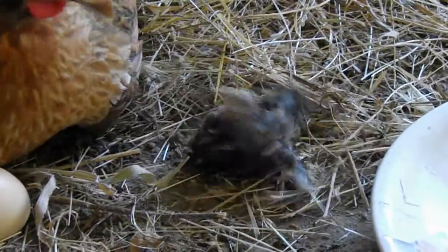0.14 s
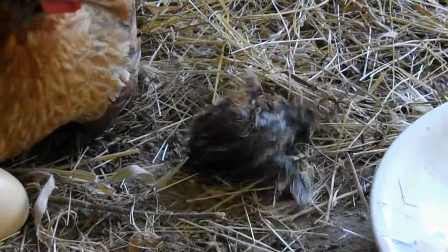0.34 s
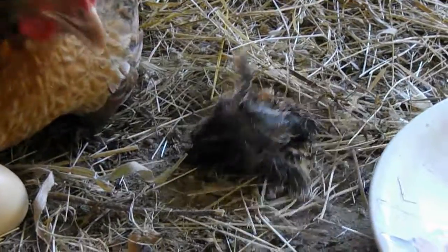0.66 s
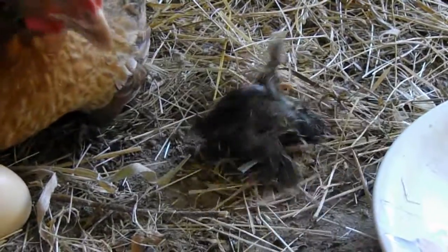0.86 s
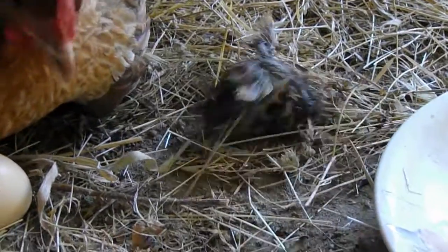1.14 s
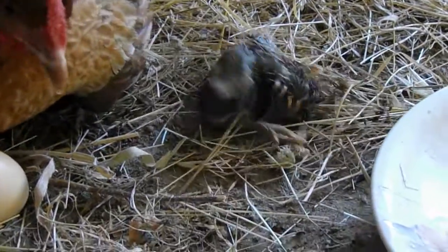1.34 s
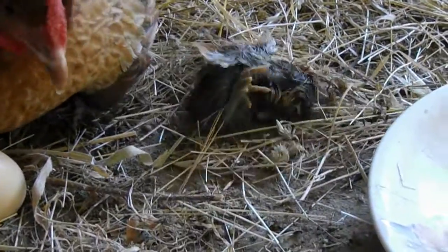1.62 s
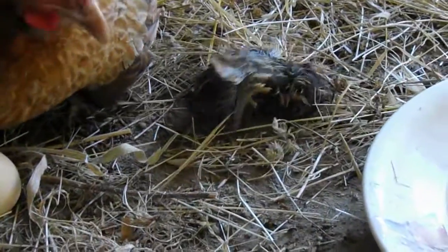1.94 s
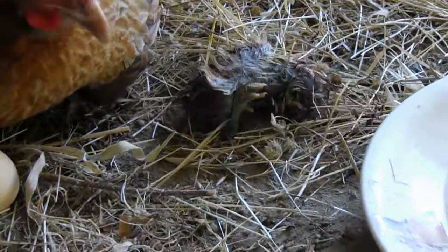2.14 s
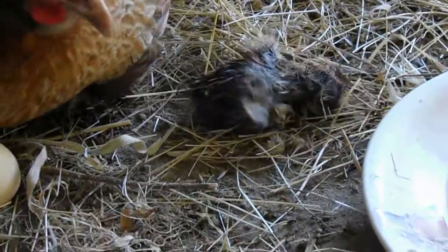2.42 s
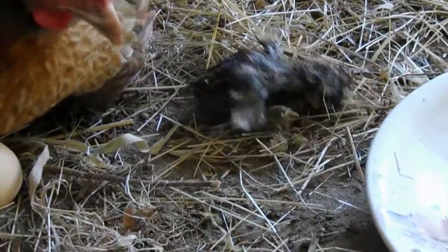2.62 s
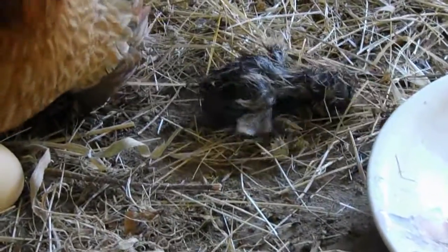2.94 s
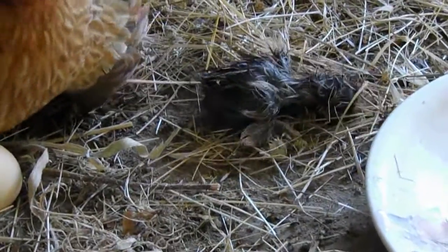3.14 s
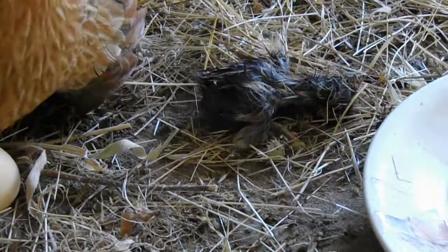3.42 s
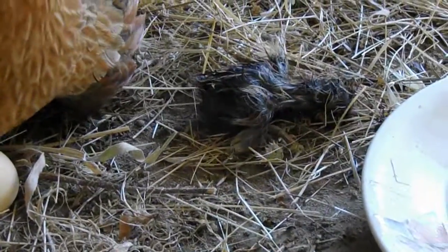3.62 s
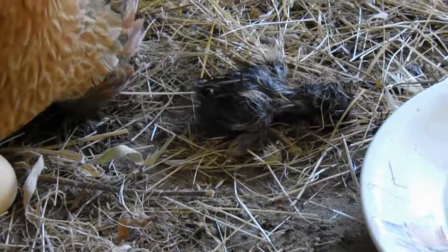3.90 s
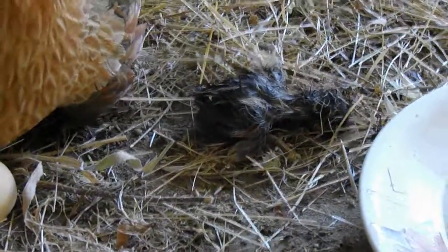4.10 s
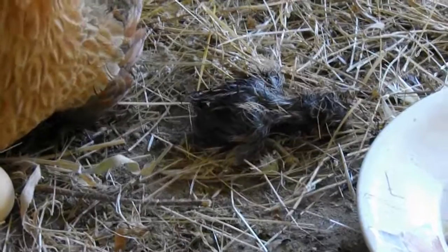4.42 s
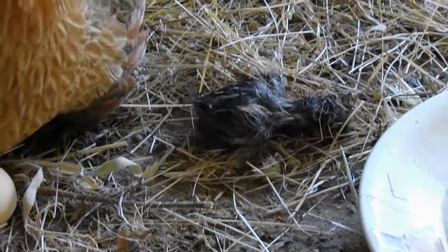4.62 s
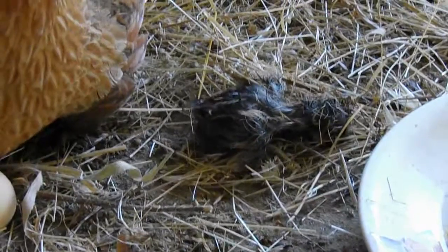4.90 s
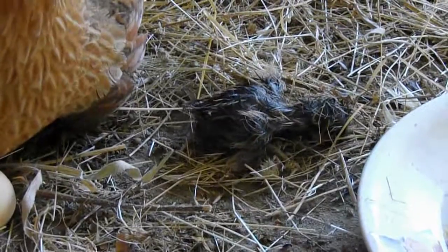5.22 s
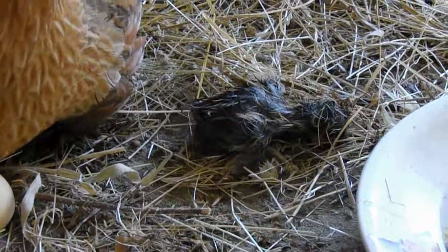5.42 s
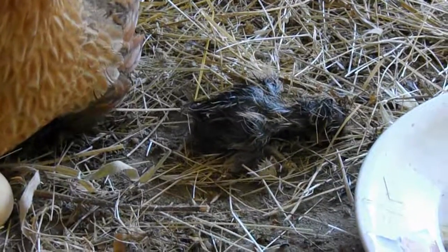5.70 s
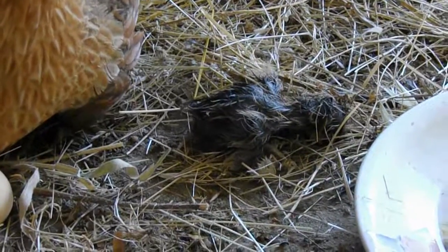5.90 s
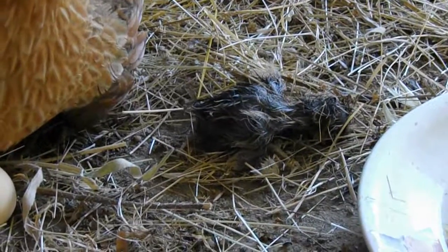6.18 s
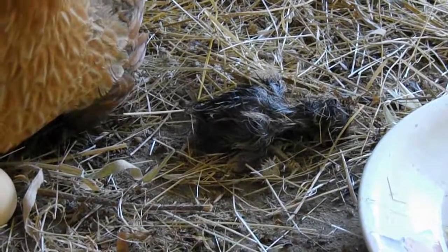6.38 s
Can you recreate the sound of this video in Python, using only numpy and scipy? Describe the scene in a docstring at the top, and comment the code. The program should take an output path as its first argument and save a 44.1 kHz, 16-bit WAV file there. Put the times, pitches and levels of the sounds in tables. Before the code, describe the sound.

Close up in a straw-floored shed, a hen's soft popping clucks answer a tiny chick's shrill peeps, which start loud and grow gentle and sparse.

```python
"""In a small shed, a newly hatched chick lies in straw and peeps: five louder arched whistles, some with
a hoarse crack near the top, then softer ones. Each is a near sine on a gliding pitch.
The hen beside it answers with low two-part clucks and throaty murmurs: voiced pulses and breath noise
through throat, mouth and beak resonances. Straw ticks now and then as tiny noise bursts, over
a steady hiss, handling rumble and a faint low drone, all made of shaped noise."""
import sys
import numpy as np
from scipy import signal
from scipy.fft import rfft, irfft, next_fast_len
from scipy.io import wavfile
from scipy.ndimage import uniform_filter1d

SR = 44100
rng = np.random.default_rng(int(sys.argv[2]) if len(sys.argv) > 2 else 0)


def materialize(psi):
    """Save the field psi as 16-bit PCM at rate SR to the path in sys.argv[1].

    A 1-D psi becomes a single channel; in a 2-D psi each row is a channel.
    """
    bounded = np.clip(np.atleast_2d(psi).T, -1, 1)
    quanta = np.round(bounded * 32767).astype(np.int16)
    wavfile.write(sys.argv[1], SR, quanta)


N = 288855
TIME = np.arange(N) / SR


def from_db(db):
    """Decibels to gain."""
    return 10 ** (np.asarray(db) / 20)


def rms_one(x):
    """Scale to an rms of one."""
    return x / np.sqrt(np.mean(x ** 2) + 1e-20)


def curves(rows, at):
    """Every further column of a table, joined by straight lines over the first column."""
    first, *columns = np.transpose(rows)
    return [np.interp(at, first, column) for column in columns]


def gate(t, start, end, edge):
    """One between start and end, with smooth edges centred on both."""
    opened = np.clip(np.minimum(t - start, end - t) / edge + .5, 0, 1)
    return np.sin(np.pi / 2 * opened) ** 2


def flutter(hz, size):
    """Random motion of rms one, mostly slower than the given rate."""
    lowpass = signal.butter(2, hz, fs=SR, output="sos")
    return rms_one(signal.sosfilt(lowpass, rng.standard_normal(size)))


def resonance(x, hz, width_hz):
    """A two-pole resonance with a gain of about one on top."""
    r = np.exp(-np.pi * width_hz / SR)
    zeros = np.array([1, 0, -1]) * (1 - r * r) / 2
    poles = [1, -2 * r * np.cos(2 * np.pi * hz / SR), r * r]
    return signal.lfilter(zeros, poles, x + 1e-18)


def coloured_noise(spectrum):
    """Noise of rms one, shaped by a spectrum that is joined over log frequency."""
    hz, db = np.transpose(spectrum)
    size = next_fast_len(N)
    bins = np.maximum(np.arange(size // 2 + 1) * SR / size, 1)
    gain = from_db(np.interp(np.log(bins), np.log(hz), db))
    return rms_one(irfft(rfft(rng.standard_normal(size)) * gain, size)[:N])


def air_hiss(level_db=-46.5):
    """Steady air noise with a fixed colour."""
    # Colour of the hiss. Each row: frequency in Hz, relative density in dB.
    hiss_colour = [(60, -14), (150, -4), (300, -10), (550, -10.5), (850, -13), (1200, -14.5), (2500, -15),
                   (3600, -15), (4800, -10.5), (5600, -16), (9000, -18), (13000, -19.5), (15600, -26.5)]
    return from_db(level_db) * coloured_noise(hiss_colour)


def handling_rumble(deep_db=-39.5, wander_db=3, wander_hz=3, upper_db=-50):
    """A deep rumble that wanders in level, and a higher one with rubs that swell above it."""
    # Colours of the deep and the higher rumble. Each row: frequency in Hz, relative density in dB.
    deep_colour = [(6, -39), (12, 7), (30, -10), (50, -5.5), (62, -13), (90, -28), (200, -100)]
    upper_colour = [(30, -37), (55, -7.5), (72, 0), (90, -9), (130, -15.5), (180, -44.5), (300, -54)]
    # Rubs. Each row: middle in s, time from there to 17 dB down in s, level in dB before a 4.5 dB cut.
    rubs = [(0.0, 0.14, -45), (0.796, 0.67, -48), (2.506, .15, -47), (3.72, .12, -48), (6.1, 0.44, -46.5)]
    shake = from_db(deep_db + wander_db * flutter(wander_hz, N))
    rub = from_db(upper_db)
    for middle, length, db in rubs:
        rub = rub + from_db(db - 4.5) * np.exp(-2 * ((TIME - middle) / length) ** 2)
    return shake * coloured_noise(deep_colour) + rub * coloured_noise(upper_colour)


def low_drone(hz=319, width_hz=146, edge_s=0.35):
    """Noise through two stacked resonances hums faintly on one pitch and swells twice."""
    # Swells of the drone. Each row: start in s, end in s, level in dB.
    swells = [(0.94, 1.548, -52), (4.55, 5.244, -49)]
    swell = sum(from_db(db) * gate(TIME, start, end, edge_s) for start, end, db in swells)
    hum = resonance(rng.standard_normal(N), hz, width_hz)
    return swell * rms_one(resonance(hum, hz, 2 * width_hz))


def shed(x, t60_s=0.55, first_echo_s=0.0036, dull_hz=6500):
    """A few wall echoes among scattered, decaying reflections, all dulled in the treble."""
    # Reflections from the nearest walls. Each row: delay in s, level in dB against the diffuse tail.
    walls = [(.013, -18), (.024, -11), (.037, -4.5)]
    t = TIME[:SR // 2]
    echoes = rng.standard_normal(len(t)) * from_db(-60 * t / t60_s) * (t > first_echo_s)
    echoes /= np.sqrt(np.sum(echoes ** 2))
    for delay, db in walls:
        echoes[int(delay * SR)] += from_db(db)
    dulled = signal.lfilter(*signal.butter(2, dull_hz, fs=SR), echoes)
    return signal.fftconvolve(x, dulled)[:N]


def straw(decay_s=0.00038, relative_width=0.89, top_hz=10500):
    """A stalk snaps with a tiny burst of broad noise."""
    # Straw ticks. Each row: start in s, peak in dB before the treble is softened, pitch in Hz.
    ticks = [(2.498, -25, 3840), (2.981, -28, 9880), (3.412, -19, 8040), (3.648, -29, 5160),
             (6.405, -27, 5000), (6.458, -24, 4460)]
    out = np.zeros(N)
    for start, db, hz in ticks:
        inside = (TIME >= start) & (TIME < start + .02)
        age = TIME[inside] - start
        burst = rng.standard_normal(len(age)) * np.exp(-age / decay_s)
        snap = resonance(burst, hz, relative_width * hz)
        out[inside] += from_db(db) * snap / abs(snap).max()
    return signal.sosfilt(signal.butter(4, top_hz, fs=SR, output="sos"), out + 1e-18)


def hen_syrinx(hz, slope_db, jitter, breath):
    """Pulses of twelve harmonics that change by slope_db an octave, with a little air in each cycle."""
    phase = 2 * np.pi * np.cumsum(hz * (1 + jitter * flutter(220, len(hz)))) / SR
    pulses = sum(from_db(slope_db * np.log2(k)) * np.cos(k * phase) for k in range(1, 13))
    return pulses + breath * (1 + np.cos(phase)) * rng.standard_normal(len(hz))


def hen_tract(source, opening_db, mouth_hz, mouth_width_hz=175, mouth_db=2.5):
    """A broad throat resonance, a narrow one of the mouth, and beak resonances that grow as it opens."""
    # The throat, a single row: resonance in Hz, width in Hz, gain in dB.
    throat_shape = (270, 456, 0)
    # The beak, each resonance applied twice. Each row: resonance in Hz, width in Hz, gain in dB.
    beak_shape = [(1393, 365, -9.5), (1738, 186, -11.5), (3530, 960, -18.5), (5130, 310, -17)]
    throat_hz, throat_width_hz, throat_db = throat_shape
    throat = from_db(throat_db) * resonance(source, throat_hz, throat_width_hz)
    mouth = from_db(mouth_db) * resonance(source, mouth_hz, mouth_width_hz)
    beak = 0
    for hz, width_hz, db in beak_shape:
        beak = beak + from_db(db + opening_db) * resonance(resonance(source, hz, width_hz), hz, width_hz)
    band = signal.butter(4, [170, 1.16 * mouth_hz], "band", fs=SR, output="sos")
    return signal.sosfilt(band, throat - mouth) + beak


def at_level(x, db):
    """Scale a call so that its loudest four milliseconds have the given rms."""
    return x * from_db(db) / np.sqrt(uniform_filter1d(x ** 2, size=180).max() + 1e-20)


def murmurs(slope_db=-6, jitter=0.155, breath=1.28, attack_share=0.34, mouth_hz=810):
    """Short, unsteady, breathy grunts of the hen that start faster than they fade."""
    # Murmurs. Each row: time in s (0.37 lengths after the strongest moment), level in dB,
    # length of the fade to 17 dB down in s, pitch in Hz.
    murmur_rows = [(0.108, -49, 0.013, 538), (0.197, -32, 0.0057, 444), (0.666, -29.5, 0.017, 474),
                   (1.234, -42, 0.011, 806), (1.279, -40, 0.012, 762), (1.688, -44, 0.011, 678),
                   (1.723, -39, 0.021, 689), (2.245, -40.5, 0.026, 708), (2.299, -34.5, 0.012, 697),
                   (2.36, -46.5, 0.061, 570), (2.734, -39.5, 0.022, 646), (3.219, -37, 0.02, 713),
                   (3.772, -34.5, 0.016, 669), (4.445, -33.5, 0.017, 655), (5.131, -33.5, 0.017, 754),
                   (6.03, -46, 0.059, 570)]
    out = np.zeros(N)
    for at, db, length, hz in murmur_rows:
        inside = abs(TIME - at) < 2 * length
        age = (TIME[inside] - at) / length + 0.37
        swell = np.exp(-2 * (age / np.where(age < 0, attack_share, 1)) ** 2)
        grunt = swell * hen_syrinx(np.full(len(swell), hz), slope_db, jitter, breath)
        out[inside] += at_level(hen_tract(grunt, opening_db=0, mouth_hz=mouth_hz), db)
    return out


def clucks(note_slope_db=-3, pop_slope_db=0.0, jitter=.025, breath=.35):
    """The hen's pitch sweeps up through a note, then drops through a brief pop."""
    # Clucks. Each row: note start in s, note level in dB, beak opening in the note in dB,
    # pop time in s, pop level in dB, beak opening in the pop in dB, mouth resonance in Hz.
    cluck_rows = [(0.132, -56, 0, .166, -22.5, -0.5, 850), (0.574, -42.5, 14, .642, -23, -2.5, 844),
                  (1.038, -34.5, 6.5, 1.087, -24.5, -2.5, 854), (1.485, -29, 0, 1.536, -24, -3.5, 835),
                  (1.791, -28, -3.5, 1.842, -22, -11, 806), (2.075, -24.5, -8, 2.125, -21, -7.5, 780),
                  (2.446, -25, -7, 2.499, -21, -9, 778), (2.857, -25.5, 5.5, 2.912, -19, -2.5, 834),
                  (3.403, -36, 17.5, 3.447, -27.5, -2, 1070), (3.925, -29, 5.5, 3.977, -26, -1.5, 815),
                  (4.676, -31, 6.5, 4.730, -25.5, -1.5, 980), (5.803, -43, 19, 5.836, -34.5, -5, 1110),
                  (6.528, -35.5, 7, 6.58, -30, 21, 1080)]
    # The rising note. Each row: time from its start in s, pitch in Hz, relative effort in dB.
    rise = [(0, 290.5, 4.5), (.005, 313.3, -4), (0.01, 495.5, 8.5), (0.019, 548, 9), (0.026, 660, 1),
            (.032, 904, 3), (0.038, 850, -9.5)]
    # The falling pop. Each row: time from its strongest moment in s, pitch in Hz.
    drop = [(-.005, 672), (-.002, 507), (.001, 387), (.004, 306), (.008, 240)]
    pop_lead_s, pop_attack_s, pop_fade_s = 0.001546, .0029, .004  # it peaks this lead before its time
    out = np.zeros(N)
    for start, note_db, note_open_db, pop_at, pop_db, pop_open_db, mouth_hz in cluck_rows:
        inside = (TIME > start - .01) & (TIME < pop_at + .04)
        t = TIME[inside]
        hz, effort_db = curves(rise, t - start)
        effort = from_db(effort_db) * gate(t - start, 0, rise[-1][0], 0.0028)
        note = effort * hen_syrinx(hz, note_slope_db, jitter, breath)
        out[inside] += at_level(hen_tract(note, note_open_db, mouth_hz), note_db)
        if pop_at < TIME[-1]:  # no pop past the end of the scene
            since = t - pop_at + pop_lead_s
            hz, = curves(drop, since)
            burst = np.exp(-.5 * (since / np.where(since < 0, pop_attack_s, pop_fade_s)) ** 2)
            pop = burst * hen_syrinx(hz, pop_slope_db, jitter, breath)
            out[inside] += at_level(hen_tract(pop, pop_open_db, mouth_hz), pop_db)
    return out


def whistle(t, hz, first_db, octave_db, third_db=-21, fourth_db=-34, top_hz=9000, top_fall_db=5):
    """The chick's syrinx: a near sine; overtones lose top_fall_db per kHz above top_hz. Also gives its phase."""
    jitter, shimmer_db = 0.0037, .4
    phase = 2 * np.pi * np.cumsum(hz * (1 + jitter * flutter(410, len(t)))) / SR
    tone = from_db(first_db) * np.sin(phase)
    # third and fourth harmonic are set against the octave
    for k, db in enumerate([0, third_db, fourth_db], 2):
        excess_khz = np.maximum(k * hz - top_hz, 0) / 1000
        tone = tone + from_db(octave_db + db - top_fall_db * excess_khz) * np.sin(k * phase)
    return tone * from_db(shimmer_db * flutter(100, len(t))), phase


def cheeps(arch_share=.85, octave_db=-18):
    """The same whistle with hardly any effort: up over the top and part of the way down."""
    # Very soft cheeps. Each row: start in s, end in s, start pitch in Hz, top pitch in Hz, level in dB.
    cheep_rows = [(-.03, 0.031, 3060, 4150, -43.5), (1.553, 1.579, 3290, 3690, -49.5),
                  (3.18, 3.203, 2750, 3670, -47), (3.89, 3.95, 3470, 4270, -49),
                  (4.024, 4.088, 3710, 4320, -46.5), (4.062, 4.091, 3260, 3610, -43.5),
                  (5.175, 5.21, 3540, 3920, -52), (5.238, 5.271, 3210, 3920, -43.5),
                  (6.247, 6.288, 2080, 3430, -49), (6.311, 6.365, 3500, 3930, -47)]
    out = np.zeros(N)
    for start, end, start_hz, top_hz, db in cheep_rows:
        inside = (TIME > start) & (TIME < end)
        progress = (TIME[inside] - start) / (end - start)
        hz = start_hz + (top_hz - start_hz) * np.sin(np.pi * arch_share * progress)
        swell = np.sqrt(2 * np.sin(np.pi * progress))
        tone, _ = whistle(TIME[inside], hz, db, db + octave_db)
        out[inside] += swell * tone
    return out


def chick_tract(hz):
    """Gain in dB of the chick's throat and beak at these frequencies."""
    # What throat and beak let out. Each row: frequency in Hz, gain in dB.
    tract = [(1900, -55), (2250, -22), (2480, -25.5), (2750, -13.5), (3100, -3), (3500, 0), (4000, -0.5),
             (4300, 0), (4700, 1.5), (5300, 1), (5900, 0.5), (6400, -8), (6800, -16.5), (7400, -18.5),
             (8500, -25.5)]
    return curves(tract, hz)[0]


def arch(t, start, top, end, start_hz, top_hz, end_hz, start_bend, top_bend, fall_bend):
    """Pitch of a peep: a bent climb, then a fall that gathers speed and may jump."""
    # Jumps of the voice in the loudest peeps. Each row: time in s, jump in Hz.
    jump_rows = [(0.836, -400), (0.856, -150), (1.348, -250), (1.377, -200), (1.384, 361), (1.873, -380),
                 (1.897, 304)]
    jump_s, settle_s = 0.0014, 0.0158
    to_climb = np.clip((top - t) / (top - start), 0, 1)
    climbed = (1 - to_climb ** top_bend) ** start_bend
    fallen = np.clip((t - top) / (end - top), 0, 1) ** fall_bend
    jumps = 0
    # half of each jump lies on either side of the glide, and settles back onto it
    for at, jump_hz in jump_rows:
        jumps = jumps + jump_hz / 2 * np.tanh((t - at) / jump_s) * np.exp(-abs(t - at) / settle_s)
    return start_hz + (top_hz - start_hz) * climbed - (top_hz - end_hz) * fallen + jumps


def peep_effort(t, start, end, swell_db):
    """Strength of a peep in dB: attack, swell and a release that lasts longer in long peeps."""
    attack_s, attack_db, release_share, release_db = 0.0096, 7, .028, 5.5
    attack = attack_db * np.exp(-(t - start) / attack_s)
    release = release_db * np.exp((t - end) / (release_share * (end - start)))
    return -swell_db * ((end - t) / (end - start)) ** 2 - attack - release


def peep(row, rasp_ratio=1.48, rasp_hz=300, scatter_db=-3, scatter_hz=800, soft_ratio=0.8, loud_ratio=1.4,
         waver=.004, waver_hz=60, ragged_share=0.57, octave_waver_db=2, sputter_db=5.0, sputter_hz=220):
    """One arched whistle; in its crack it falters, and ragged tones come up that depend on its force."""
    # Cracks. Each row: rasp level in dB, crack length in s, loss of the whistle in dB.
    cracking = [(-73, .045, 2), (-41.5, 0.048, 2), (-37.5, .026, 5), (-30, 0.02, 3.5), (-21, .023, 7)]
    start, _, end, *_, level_db, swell_db, octave_db, crack_at, crack_db = row
    inside = (TIME > start - .005) & (TIME < end + .005)
    t = TIME[inside]
    size = len(t)
    hz = arch(t, *row[:9]) * (1 + waver * flutter(waver_hz, size))
    effort_db = level_db + peep_effort(t, start, end, swell_db)
    crack_s, loss_db = curves(cracking, crack_db)
    cracked = gate(t, crack_at - crack_s / 2, crack_at + crack_s / 2, 0.0026)
    falter_db = cracked * loss_db * (1 + ragged_share * flutter(rasp_hz, size))
    overtone_db = octave_db + octave_waver_db * flutter(waver_hz, size)
    first_db = effort_db + chick_tract(hz) - falter_db
    tone, phase = whistle(t, hz, first_db, effort_db + chick_tract(2 * hz) + overtone_db)
    # forced peeps rasp between fundamental and octave
    force = np.interp(level_db, [-27, -13], [0, 1])
    rasp = force * flutter(rasp_hz, size) * np.sin(rasp_ratio * phase)
    # a hoarse haze: below the whistle in soft peeps, above it in forced ones
    scatter_ratio = soft_ratio + force * (loud_ratio - soft_ratio)
    scatter = from_db(scatter_db) * flutter(scatter_hz, size) * np.sin(scatter_ratio * phase)
    sputter = rms_one(from_db(sputter_db * np.tanh(flutter(sputter_hz, size))))
    crack = from_db(crack_db) * cracked * sputter * (rasp + scatter)
    out = np.zeros(N)
    out[inside] = np.sqrt(2) * (tone + crack) * gate(t, start, end, 0.0018)
    return out


def scene():
    """Chick and hen close by, with a little of the shed around them."""
    # Peeps. Each row: start in s, top in s, end in s, start pitch in Hz, top pitch in Hz, end pitch in Hz,
    # bend out of the start, bend into the top, bend of the fall (1 is straight),
    # level in dB before effort and tract, swell toward the end in dB, octave in dB against the
    # fundamental before the tract, middle of the crack in s, rasp level in dB before force and sputter.
    peeps = [(0.283, 0.348, 0.407, 3590.0, 4265, 2770, 0.92, 2.3, 2.7, -22, 4.5, -6.5, 0.335, -43.0),
             (0.682, 0.826, 0.902, 3550.0, 4210.0, 2370.0, 0.98, 1.68, 1.36, -13, 12, -12.5, 0.824, -38.0),
             (1.228, 1.321, 1.408, 3350.0, 4223, 2335, 2.1, 1.84, 1.32, -7.5, 10, -3.5, 1.337, -23.5),
             (1.75, 1.849, 1.929, 3190.0, 4024, 2110, 0.71, 0.93, 2.54, -12.5, 6.5, -4.5, 1.853, -31),
             (2.24, 2.341, 2.395, 3080.0, 4160, 2150, 0.9, 0.67, 3.7, -14, 8, -21, 2.33, -60),
             (2.696, 2.741, 2.781, 3160.0, 3590, 2480, 1.07, 0.97, 4.4, -26, 0, -30, 2.74, -62.0),
             (3.056, 3.118, 3.148, 3550.0, 4130.0, 2600, 3.78, 1.9, 2.2, -33, -0.2, -26.0, 3.108, -52),
             (3.402, 3.455, 3.487, 3050.0, 4040, 2590.0, 2.1, 1.56, 2.3, -34.5, 1.5, -22, 3.45, -57.0),
             (3.631, 3.665, 3.688, 3080.0, 4360, 3200, 1.46, 1.5, 2.57, -43.0, -12.5, -19.0, 3.665, -60.0),
             (3.777, 3.821, 3.871, 3420.0, 4110, 2430, 0.8, 0.79, 3.8, -27.5, 0, -25, 3.821, -43.5),
             (4.155, 4.208, 4.239, 2060.0, 3964, 2570, 0.64, 1.19, 2.32, -26, -8, -30, 4.206, -39.5),
             (4.511, 4.553, 4.604, 3120.0, 3940.0, 2690, 1.63, 1.15, 4.7, -27.5, -2.5, -21, 4.561, -46),
             (4.981, 5.026, 5.079, 2850.0, 4030, 2560, 0.94, 0.62, 6.2, -26.7, -6, -26, 5.035, -42.5),
             (5.371, 5.423, 5.476, 3100.0, 3925, 2460, 0.65, 0.98, 3.3, -24.5, 1.8, -22, 5.417, -51)]
    shed_chick_db, shed_hen_db = -24.5, -20
    background = air_hiss() + handling_rumble() + low_drone()
    hen = murmurs() + clucks()
    chick = straw() + cheeps() + sum(peep(row) for row in peeps)  # the straw sounds beside the chick
    reflections = shed(from_db(shed_chick_db) * chick + from_db(shed_hen_db) * hen)
    return (background + reflections + hen + chick)[None]


def record(dry, cutoff_hz=15800):
    """The top of the treble is cut steeply."""
    return signal.sosfilt(signal.ellip(10, .1, 80, cutoff_hz, fs=SR, output="sos"), dry)


dry = scene()
out = record(dry)
materialize(out)
```